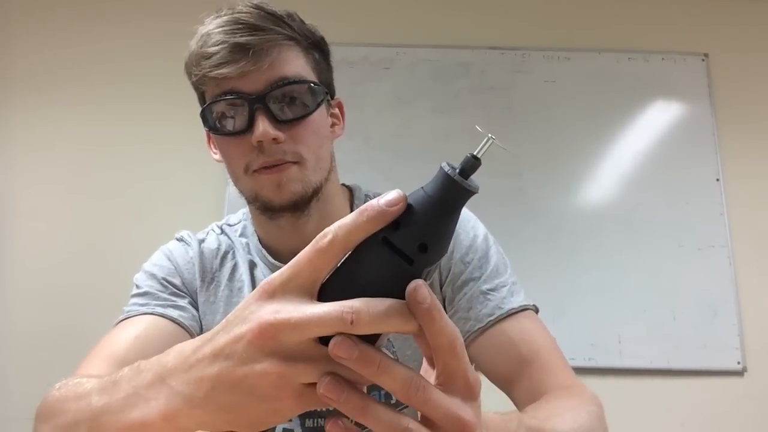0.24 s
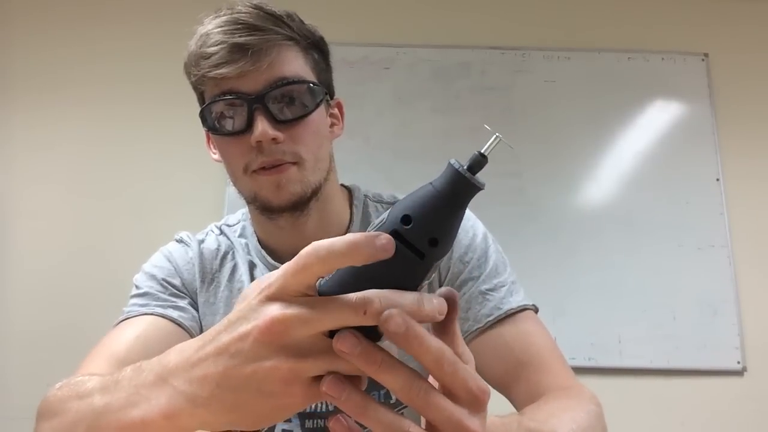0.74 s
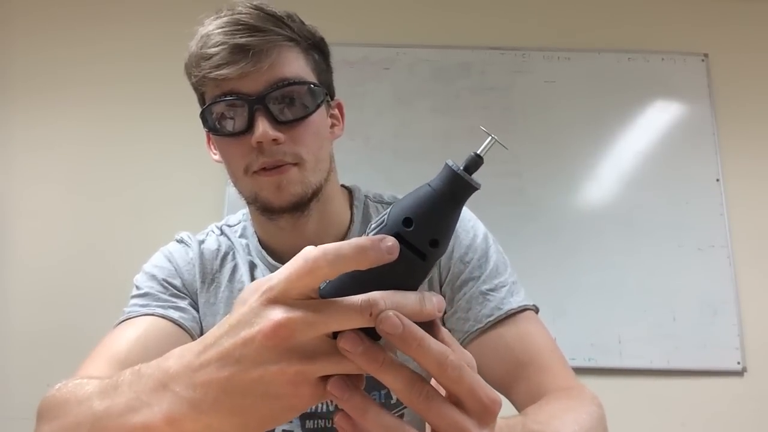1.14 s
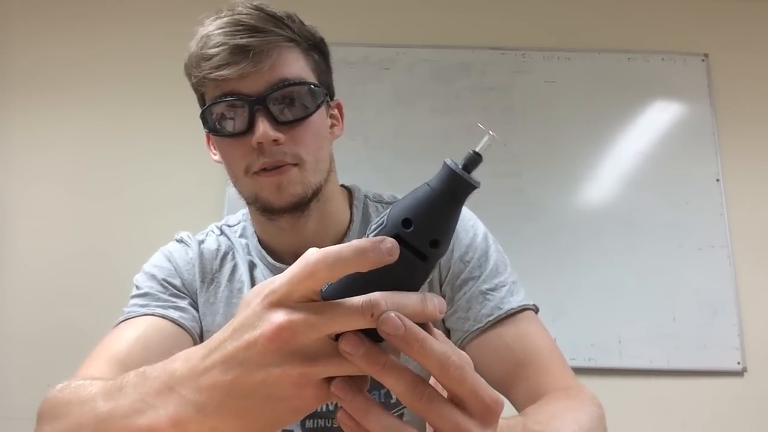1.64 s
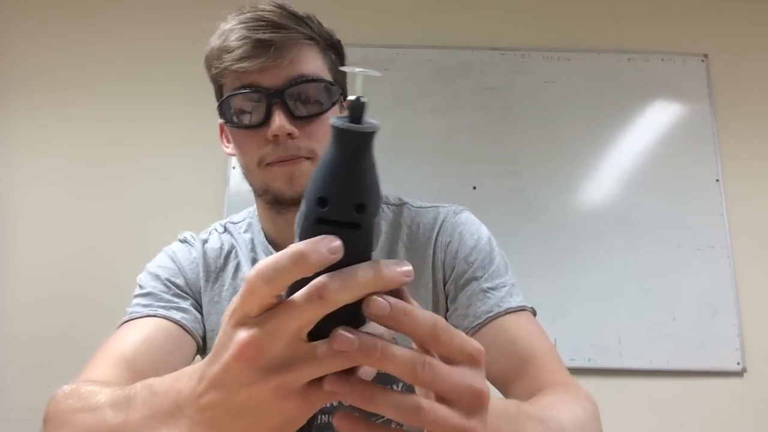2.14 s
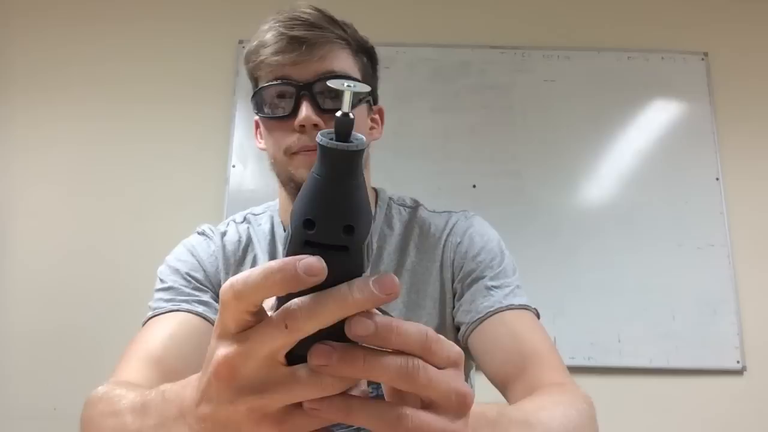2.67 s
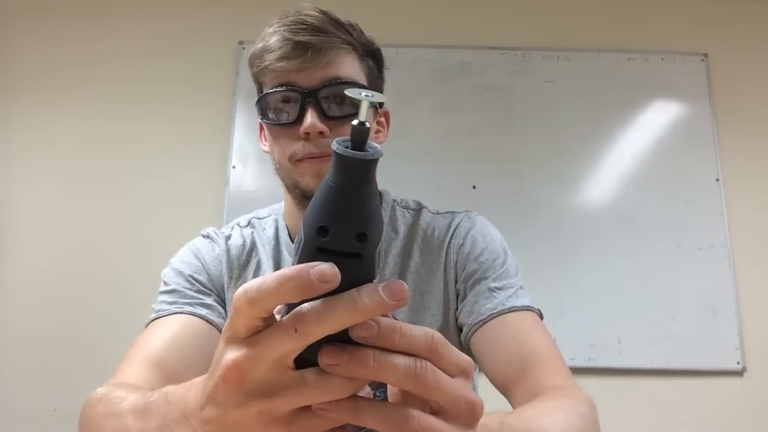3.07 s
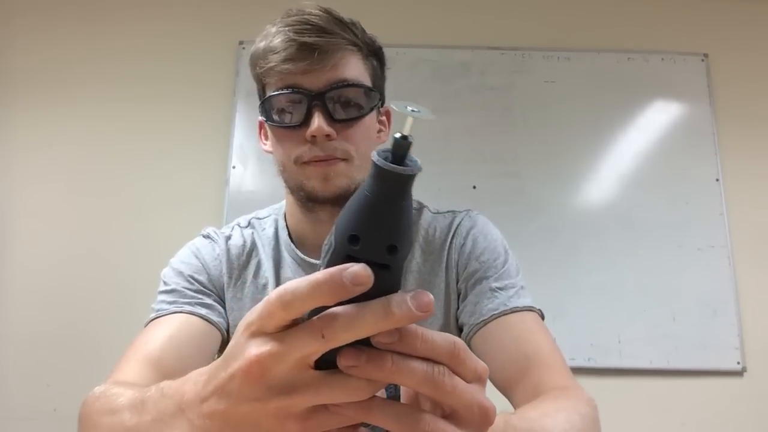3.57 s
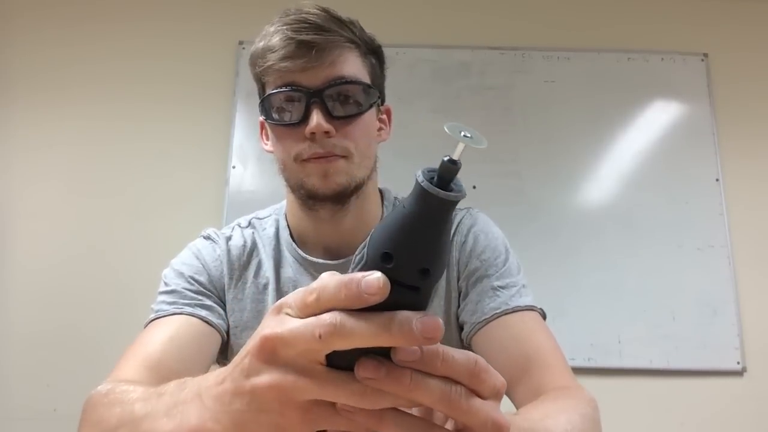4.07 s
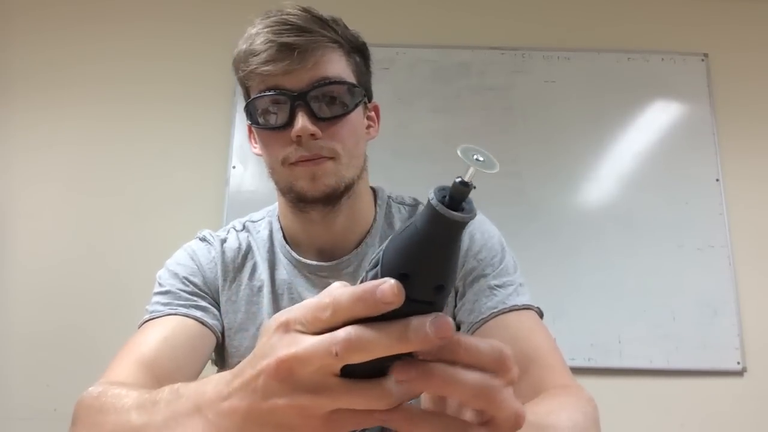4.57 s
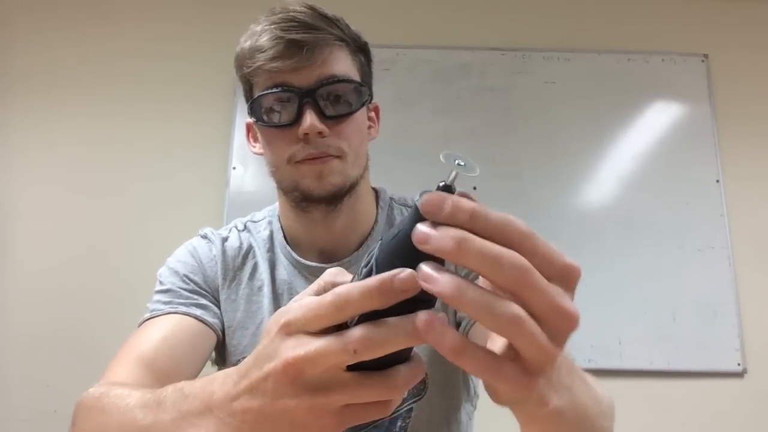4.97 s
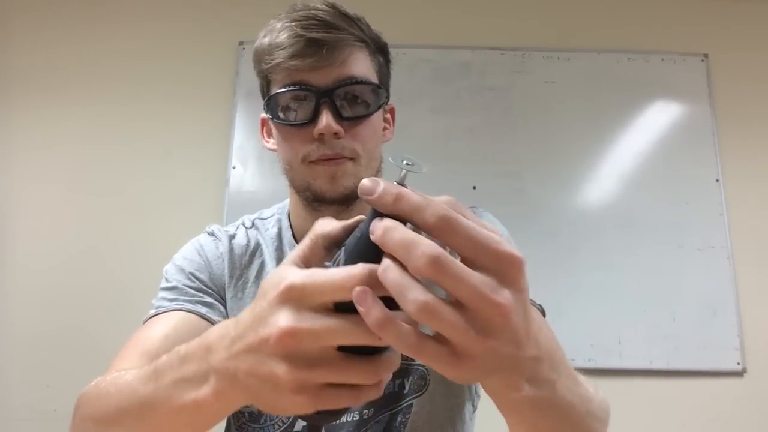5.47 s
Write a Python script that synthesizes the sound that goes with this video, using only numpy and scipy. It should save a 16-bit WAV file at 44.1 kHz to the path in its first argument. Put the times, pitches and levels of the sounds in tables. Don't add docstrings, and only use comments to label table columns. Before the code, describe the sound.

Close handheld rotary tool spins up fast, whines and hums at full speed, then coasts down in pitch to a faint rattle in a bare room.

```python
import sys
import numpy as np
from scipy import signal
from scipy.fft import rfft, irfft, next_fast_len
from scipy.io import wavfile
from scipy.ndimage import uniform_filter1d

SR = 44100
rng = np.random.default_rng(int(sys.argv[2]) if len(sys.argv) > 2 else 0)


def unload_wav(signal):
    wavfile.write(
        sys.argv[1],
        SR,
        np.round(np.clip(np.atleast_2d(signal).T, -1, 1) * 32767).astype(np.int16),
    )


def invert_db(x):
    u = np.asarray(x, float) / 20
    return 10 ** u


N = 251811

# f/Hz, density/dB
FLOOR_COLOUR = [(15, -56), (25, -33.5), (37, -24.5), (102, -7), (126, -21.5), (184, -9), (205, -15),
                (620, -17.5), (13800, -21), (15800, -44.5)]
FLOOR_DB, FLOOR_LIFT_DB = -69.5, 6
# t/s, change/dB
FLOOR_STEPS = [
    (5.27, -2),
    (5.5, -3),
    (5.635, -2.5),
    (5.685, 3.5),
]
FLOOR_STEP_S = .012

# t/s, peak level/dB, f/Hz, spread/s
DESK_BUMPS = [(1.5, -62, 55.06, .02), (1.55, -61, 74, 0.015), (1.605, -57, 75, .01), (1.64, -52, 60, .012),
              (1.768, -52, 79, 0.01), (1.87, -62, 65.6, 0.026), (2.435, -64, 75.4, 0.018),
              (2.472, -55, 80.37, 0.0092), (2.52, -58, 60, .035), (2.59, -66, 95, .02),
              (4.03, -47, 62, 0.016), (4.137, -53, 68, 0.016), (5.17, -54, 73, 0.011),
              (5.2, -56, 72, 0.032), (5.199, -58, 128, 0.023), (5.25, -58, 70, 0.033)]
RUMBLE_DB = -71

OFFICE_DB, OFFICE_T60_S, WALL_CUT_HZ = -21, .5, 3500
LINGER_HZ, LINGER_DB, LINGER_T60_S = 412, -30.5, 0.68

# f/Hz, density/dB
AIR_COLOUR = [(100, -36), (200, -22), (350, -14.5), (520, -7), (760, 0), (950, -2.5), (1400, -6.5),
              (2200, -9.5), (2700, -10.5), (4000, -10), (6500, -4.5), (9500, -8.5), (12500, -9.5),
              (15500, -7.5)]
# f/Hz, power of speed/1
AIR_POWER = [(100, .6), (270, 0.61), (420, 0.92), (700, 1.53), (1500, 1.2), (2400, .85), (4500, 1.44),
             (14000, 1.7)]
AIR_DB, AIR_LOADED_SHARE, STALL_PER_DB = -29.0, 0.12, 0.0166
SWITCH_PUFF_DB, SWITCH_PUFF_S = 0.5, 0.12

HOUSING_HZ, HOUSING_WIDTH_HZ = 1073, 150
RATTLE_AT_S, RATTLE_DB, RATTLE_RISE_DB_PER_S, RATTLE_FALL_DB_PER_S = 4.76, -52, 85, 42
TICK_DB, TICK_FROM_S, TICK_UNTIL_S, TICK_LOW_HZ = -66, 4.95, 5.27, 9000

# shaft order/1, level/dB, f/Hz, width/Hz
BRUSH_LINES = [(12, -60, 2500, 300), (15, -52, 2450, 330), (16, -43, 3500, 380), (16, -66, 950, 150),
               (22, -58, 3500, 600), (30, -63, 2900, 500), (32, -60.5, 2750, 550)]
BRUSH_OFF_PEAK_DB = -21.5
# shaft order/1, level/dB
FAINT_ORDERS = [(15, -57), (16, -56), (17, -58), (19, -60), (20, -60), (29, -60), (36, -54)]
# shaft order/1, level before/dB, level after/dB, t/s, turn length/s
BUZZ_LINES = [(2, -53, -38, 1.85, .15), (3, -58, -42, .45, .08), (4, -65, -45, 1.5, 1.2),
              (5, -62, -44, 2.4, .9), (6, -52, -46, 2.4, 1.1), (7, -58, -45, .4, .15),
              (9, -50, -44, 2.5, .6)]
# shaft order/1, t/s, half width/s, level left/dB
BUZZ_FADES = [(2, 0.66, .2, -12.5), (2, 2.3, 0.65, -2), (3, 1.7, 0.1, -6), (3, 1.85, 0.12, -1),
              (3, 2.7, 0.61, -6.5), (3, 3.84, 0.22, -5), (4, 3.2, .3, 0.5), (4, 2.66, 0.084, -16),
              (4, 1.2, 0.36, -15), (5, .9, .3, -13.5), (5, 1.7, .3, -12), (5, 3.15, 0.45, -14),
              (6, 1.8, .2, -8), (6, 2.6, .45, -21), (6, 3.6, 0.12, -10), (6, 4.49, 0.31, -14),
              (7, 1.48, 0.66, -6), (7, 3.2, .15, -19), (7, 3.0, .15, -2.5), (7, 3.73, .15, 1),
              (9, .25, .2, -12), (9, 1.0, .35, -21.5), (9, 2.1, .2, -27), (9, 3.3, .15, -21)]
BUZZ_WANDER_DB, BUZZ_WANDER_HZ = .8, 1.1

BLADE_FADES = [(0.0, 0.059, -2), (.28, 0.24, -10.5), (.41, 0.062, 0), (.55, 0.066, -7), (.72, 0.091, -5),
               (.81, 0.086, -25), (1.06, 0.079, -20), (1.18, 0.18, -7), (1.4, 0.048, -12),
               (1.63, 0.088, -29), (1.94, 0.14, -28), (2.15, 0.095, -8.5), (2.35, 0.035, -7),
               (2.69, 0.2, -28), (2.95, 0.11, -4), (3.07, 0.022, -15), (3.32, 0.22, -24),
               (3.79, 0.043, -36), (3.95, 0.22, -10.5), (4.05, 0.014, -6.5), (4.2, 0.063, -13),
               (4.3, 0.11, -13), (4.39, 0.036, 1), (4.46, 0.039, -5), (4.56, 0.045, -20), (4.82, .05, -15)]
SLOT_FADES = [(0.0, .085, -30), (.165, .025, -9), (.25, .05, -9), (.355, .06, -9), (.55, .05, -14),
              (.64, .045, -20), (.77, .03, -12), (.95, .13, -14), (1.1, .12, -12), (1.25, .15, -13),
              (2.0, .24, -22), (2.12, .08, -12), (2.62, .22, -16), (2.88, .12, -5), (3.3, .18, -12),
              (3.8, .1, -10)]
BELOW_FADES = [(0.0, .12, -28), (.24, .035, -12), (.35, .06, -6), (.58, .08, -10), (1.15, .22, -16),
               (2.0, .25, -8), (2.7, .4, -15), (3.65, .15, -8)]
UNBALANCE_FADES = [(.13, .06, -22), (.168, .05, -22), (.32, .03, -6), (.48, .07, -8), (.7, .06, -5),
                   (.85, .03, -4), (4.105, .022, -15), (4.215, .035, -20), (4.25, .025, -14),
                   (4.375, .04, -20), (4.44, .04, -16), (4.51, .05, -8), (4.66, .025, -12),
                   (4.755, .05, -16)]

BLADE_COUNT, BLADE_DB, BLADE_POWER = 18, -24, 3.8
BLADE_LAG_DB, BLADE_LAG_S = 5.5, 0.49
SLOTS, SLOT_DB, BELOW_DB = 8, -30.5, -36
SURGE_DB, SURGE_S = 20, .17
SLOT_SINK_DB_PER_S = 4
SLOT_COAST_DB, SLOT_COAST_POWER = -67, 1.45

# t/s, level/dB
UNBALANCE_LEVEL = [(0.0, -54), (0.04, -38.5), (0.3, -37), (0.6, -32.5), (0.8, -34.5), (1.0, -27.5),
                   (1.3, -25.5), (1.4, -29.5), (1.8, -26), (3.0, -25), (3.5, -27), (3.8, -31.5),
                   (4.04, -30.5), (4.07, -23.5), (4.14, -37), (4.31, -39.5), (4.6, -48), (5.15, -82)]

FREE_HZ, CREEP_HZ_PER_S = 407.79, 2.66
QUICK_GAP_HZ, QUICK_S, SLOW_GAP_HZ, SLOW_S = 79.9, .163, 38.0, 1.0
TILT_SAG_HZ, TILT_AT_S, TILT_S = 3.32, 2.973, .21
COAST_AT_S, FRICTION_HZ, DRAG_S, TUG_HZ, TUG_S, EASE_HZ = 4.035, 469.7, 1.968, 4.2, .049, 24
RIPPLE_HZ, RIPPLE_PEAK_S, OFF_S = 100, .0035, 4.04

# t/s, low f/Hz, high f/Hz, level/dB
CHANNEL_SPLITS = [
    (1.813, 4100, 5800, -42),
    (2.069, 11000, 13800, -41),
    (2.369, 9700, 11800, -41),
    (3.185, 12400, 14500, -42),
    (3.603, 12400, 13800, -45),
    (4.321, 4100, 5800, -42),
    (4.323, 11700, 13100, -50),
    (4.695, 9700, 11700, -59),
    (5.413, 5700, 7600, -74),
]
TOP_HZ = 15200


def rms_one(x):
    return x / np.sqrt(np.mean(x ** 2) + 1e-20)


def in_time(rows):
    s, *columns = np.transpose(rows)
    return [np.interp(np.arange(N) / SR, s, c) for c in columns]


def at_hz(points, hz):
    f, value = np.transpose(points)
    return np.interp(np.log(hz), np.log(f), value)


def drift(rate):
    r = np.exp(-80 * np.pi * rate / SR)
    white = rng.standard_normal(N // 40 + 2002)
    slow = signal.lfilter([1], [1, -2 * r, r * r], white)[2000:]
    return np.interp(np.arange(N) / 40, np.arange(len(slow)), rms_one(slow - slow.mean()))


def bandpass(x, order, low, high):
    return signal.sosfilt(signal.butter(order, [low, high], "band", fs=SR, output="sos"), x)


def bands(spectrum):
    edges = 25 * 2 ** np.arange(0, 9.5, 1 / 3)
    white = rng.standard_normal((2, N))
    for k, (low, high) in enumerate(zip(edges, edges[1:])):
        hz = np.sqrt(low * high)
        yield hz, bandpass(white[k % 2], 2, low, high) * invert_db(at_hz(spectrum, hz))


def coloured(spectrum):
    hz = np.arange(1, N // 2 + 2) * SR / N
    return rms_one(irfft(rfft(rng.standard_normal(N)) * invert_db(at_hz(spectrum, hz)), N))


def fades(t, rows):
    coarse = t[::40]
    out = np.ones_like(coarse)
    for s, width, left_db in rows:
        left = invert_db(2 * left_db)
        out = out * np.sqrt(left + (1 - left) * np.tanh((coarse - s) / width) ** 2)
    return np.interp(t, coarse, out)


def tone(angle, level_db, waver_db, wobble):
    height = np.sqrt(2) * invert_db(level_db + waver_db * drift(17.6))
    return height * np.sin(angle + wobble * drift(28))


def room_tone(t):
    level_db = FLOOR_DB + FLOOR_LIFT_DB
    for s, db in FLOOR_STEPS:
        level_db = level_db + db * (1 + np.tanh((t - s) / FLOOR_STEP_S)) / 2
    return invert_db(level_db) * coloured(FLOOR_COLOUR)


def desk():
    rumble = bandpass(rng.standard_normal(N), 3, 50, 200)
    out = invert_db(RUMBLE_DB + 1.9 * drift(3)) * rms_one(rumble)
    for s, peak_db, hz, spread_s in DESK_BUMPS:
        near = slice(int((s - .1) * SR), int((s + .1) * SR))
        t = np.arange(near.start, near.stop) / SR - s
        out[near] += invert_db(peak_db) * np.exp(-.5 * (t / spread_s) ** 2) * np.cos(2 * np.pi * hz * t)
    return out


def office(x):
    size = next_fast_len(N + SR)
    hz = np.arange(size // 2 + 1) * SR / size
    response = 0
    for k, lag in enumerate(rng.uniform(.014, .045, 10)):
        wall = invert_db(-60 * lag / OFFICE_T60_S) / (1 + 1j * hz / WALL_CUT_HZ)
        loop = wall * np.exp(-2j * np.pi * hz * lag)
        response = response + (-1) ** k * loop / (1 - loop)
    return irfft(rfft(x, size) * response, size)[:N]


def linger(t):
    since = np.maximum(t - OFF_S, 0)
    level = invert_db(LINGER_DB - 60 * since / LINGER_T60_S) * np.clip(since / 0.033, 0, 1)
    return level * np.sin(2 * np.pi * LINGER_HZ * t)


def cooling_air(t, speed, angle):
    speed_db = 20 * np.log10(speed / FREE_HZ) * np.where(t > COAST_AT_S, 1, AIR_LOADED_SHARE)
    speed_db = speed_db * (1 - STALL_PER_DB * speed_db)
    puff_db = SWITCH_PUFF_DB * np.exp(-.5 * ((t - COAST_AT_S) / SWITCH_PUFF_S) ** 2)
    rush = np.zeros(N)
    for hz, band in bands(AIR_COLOUR):
        rush += band * invert_db(at_hz(AIR_POWER, hz) * speed_db + puff_db + 0.85 * drift(13))
    steady = rush[2 * SR:3 * SR]
    return invert_db(AIR_DB) * rush / np.sqrt(np.mean(steady ** 2)) * (1 + 0.079 * np.sin(angle))


def housing_rattle(t):
    r, w = np.exp(-np.pi * HOUSING_WIDTH_HZ / SR), 2 * np.pi * HOUSING_HZ / SR
    b, a = [1, 0.0094, -0.85], [1, -2 * r * np.cos(w), r * r]
    shell = signal.lfilter(b, a, signal.lfilter(b, a, rng.standard_normal(N)))
    rise_db = RATTLE_RISE_DB_PER_S * (RATTLE_AT_S - t)
    fall_db = RATTLE_FALL_DB_PER_S * (t - RATTLE_AT_S)
    return invert_db(RATTLE_DB - np.maximum(rise_db, fall_db)) * rms_one(shell)


def brush_ticks(t, angle):
    hiss = bandpass(rng.standard_normal(N), 3, TICK_LOW_HZ, 1.8 * TICK_LOW_HZ)
    scratch = np.exp(2.5 * (np.cos(angle) - 1))
    return invert_db(TICK_DB) * (t > TICK_FROM_S) * (t < TICK_UNTIL_S) * scratch * hiss


def brush_whine(speed, angle, coast_db):
    out = np.zeros(N)
    for order, level_db, hz, width in BRUSH_LINES:
        shell = invert_db(BRUSH_OFF_PEAK_DB + coast_db) + np.exp(-.5 * ((order * speed - hz) / width) ** 2)
        out += shell * tone(order * angle, level_db, 2.2, (order / 27) ** 4)
    return out


def powered_buzz(t, angle, ripple):
    out = tone((SLOTS + 1) * angle - ripple, -60.5, 7.4, 0.27)
    out += tone(angle + ripple, -59.5, 5.4, .3)
    for order, before_db, after_db, s, length in BUZZ_LINES:
        turned = (1 + np.tanh((t - s) / length)) / 2
        level_db = before_db + (after_db - before_db) * turned + BUZZ_WANDER_DB * drift(BUZZ_WANDER_HZ)
        dips = fades(t, [row[1:] for row in BUZZ_FADES if row[0] == order])
        out += dips * tone(order * (angle - 4 / 7), level_db, 1.5, .2)
    for order, level_db in FAINT_ORDERS:
        out += tone(order * angle, level_db, 3.5, .4)
    return out


def fan_blades(t, angle, ripple, live, coast_db):
    level_db = BLADE_DB + BLADE_POWER * coast_db - BLADE_LAG_DB * np.exp(-t / BLADE_LAG_S)
    passing = tone(BLADE_COUNT * angle, 0, 2.3, .3)
    below = tone(BLADE_COUNT * angle - ripple, -24.0, 3.3, 0.63)
    return invert_db(level_db) * fades(t, BLADE_FADES) * (passing + live * below)


def armature_slots(t, angle, ripple, live, coast_db):
    surge_db = SURGE_DB * np.exp(-t / SURGE_S)
    driven_db = SLOT_DB - SLOT_SINK_DB_PER_S * t + surge_db
    slot_db = live * driven_db + (1 - live) * (SLOT_COAST_DB + SLOT_COAST_POWER * coast_db)
    below_db = BELOW_DB - SLOT_SINK_DB_PER_S * np.minimum(t, 2.1) + 1.3 * surge_db
    above_db = slot_db - 13 + 15 * np.exp(-t / .1)
    centre = tone(SLOTS * angle, slot_db, 1.6, .12)
    above = tone(SLOTS * angle + ripple, above_db, 1.5, 0.42)
    below = tone(SLOTS * angle - ripple, below_db, 1.6, .12)
    return fades(t, SLOT_FADES) * (centre + live * above) + live * fades(t, BELOW_FADES) * below


def unbalance(t, angle):
    return fades(t, UNBALANCE_FADES) * tone(angle, in_time(UNBALANCE_LEVEL)[0], .3, 0.012)


def driven_speed(s):
    gaps = QUICK_GAP_HZ * np.exp(-s / QUICK_S) + SLOW_GAP_HZ * np.exp(-s / SLOW_S)
    sag = TILT_SAG_HZ * np.exp(-.5 * ((s - TILT_AT_S) / TILT_S) ** 2)
    return FREE_HZ + CREEP_HZ_PER_S * s - gaps - sag


def shaft(t):
    since = np.maximum(t - COAST_AT_S, 0)
    start = driven_speed(COAST_AT_S) + FRICTION_HZ - TUG_HZ
    braked = start * np.exp(-since / DRAG_S) - FRICTION_HZ + TUG_HZ * np.exp(-since / TUG_S)
    eased = EASE_HZ * np.logaddexp(0, braked / EASE_HZ)
    return np.where(since > 0, eased, driven_speed(t))


def rotor(t, speed, angle):
    coast_db = 20 * np.log10(speed / FREE_HZ) * (t > COAST_AT_S)
    ripple = 2 * np.pi * RIPPLE_HZ * (t - RIPPLE_PEAK_S)
    live = np.clip((OFF_S + 0.076 - t) / 0.05, 0, 1)
    out = (1 - live) * brush_whine(speed, angle, coast_db)
    out += live * powered_buzz(t, angle, ripple)
    out += fan_blades(t, angle, ripple, live, coast_db)
    return out + armature_slots(t, angle, ripple, live, coast_db)


def scene():
    t = np.arange(N) / SR
    speed = shaft(t)
    angle = 2 * np.pi * np.cumsum(speed) / SR
    lines = rotor(t, speed, angle)
    background = room_tone(t) + desk()
    room = invert_db(OFFICE_DB) * office(lines) + linger(t)
    noises = cooling_air(t, speed, angle) + housing_rattle(t) + brush_ticks(t, angle)
    mono = background + room + noises + lines + unbalance(t, angle)
    return np.array([mono, mono])


def channel_splits():
    out, size = np.zeros(N), 2048
    hz = np.arange(size // 2 + 1) * SR / size
    for s, low, high, level_db in CHANNEL_SPLITS:
        noise = irfft(rfft(rng.standard_normal(size)) * ((hz > low) & (hz < high)), size)
        start = int(s * SR) - size // 2
        out[start:start + size] += invert_db(level_db) * rms_one(noise) * 1.2 * np.hanning(size)
    return out * [[1], [-1]]


def thin_treble(x, from_hz, share):
    def wide(v):
        return uniform_filter1d(uniform_filter1d(v, size=31, axis=0), size=15, axis=1)
    hz, _, cells = signal.stft(x, SR, nperseg=1024)
    power = abs(cells) ** 2
    near = uniform_filter1d(uniform_filter1d(power, size=3, axis=0), size=4, axis=1) + 1e-20
    around = np.exp(wide(np.log(near))) + .04 * wide(near)
    thrift = share * np.clip(hz / from_hz - 1, 0, 1)[:, None] ** .3
    return signal.istft(cells * (near > thrift * around), SR, nperseg=1024)[1][:N]


def band_limit(x):
    return signal.sosfilt(signal.butter(12, 16200, fs=SR, output="sos"), x)


def record(dry):
    mix = signal.sosfilt(signal.butter(2, 45, "high", fs=SR, output="sos"), dry[0])
    mix = thin_treble(mix, from_hz=7000, share=.52) + channel_splits()
    mix = signal.sosfilt(signal.ellip(12, .3, 75, TOP_HZ, fs=SR, output="sos"), mix)
    return band_limit(mix)


dry = scene()
out = record(dry)
unload_wav(out)
```